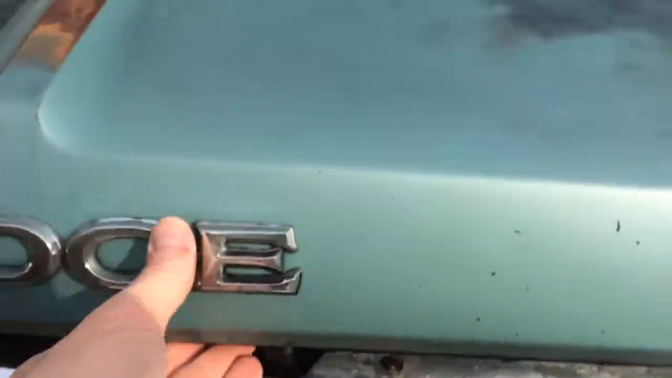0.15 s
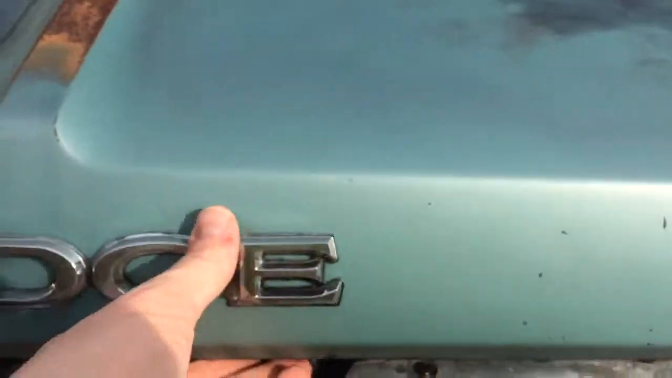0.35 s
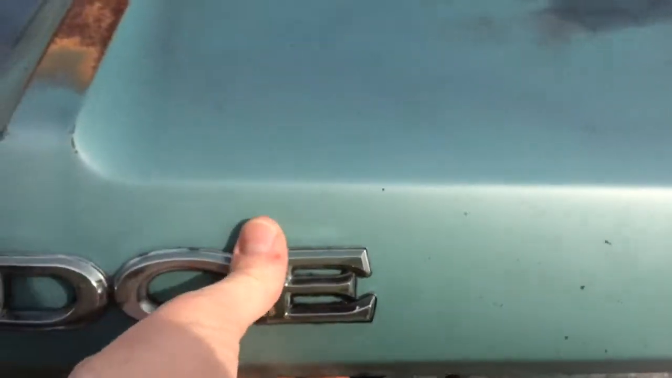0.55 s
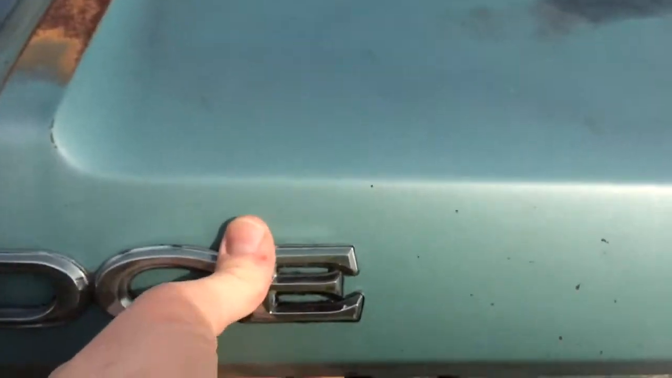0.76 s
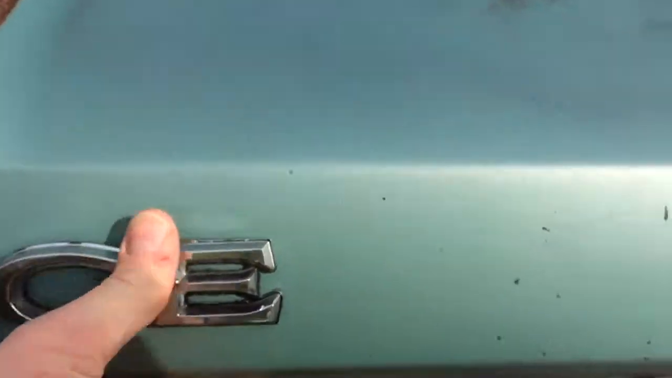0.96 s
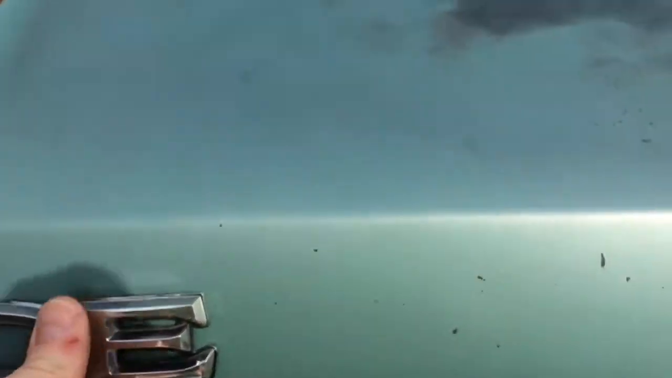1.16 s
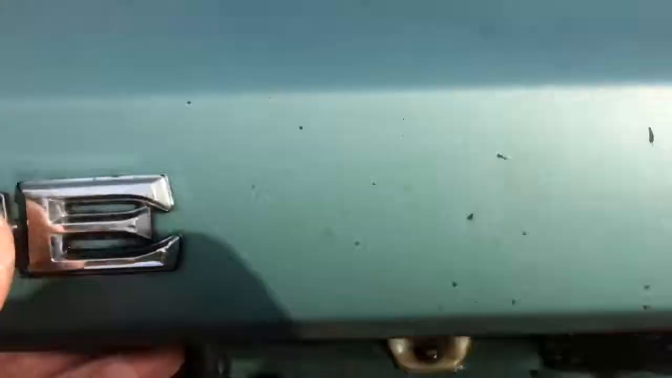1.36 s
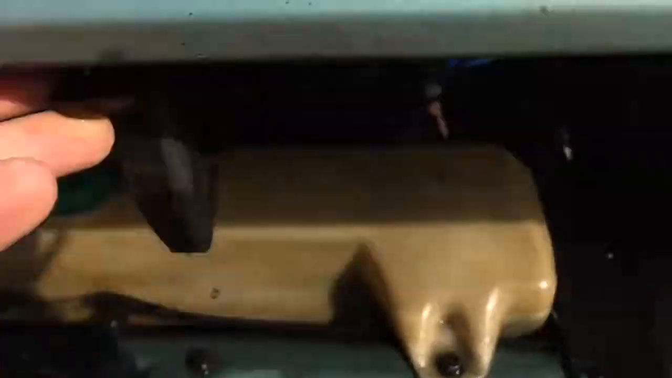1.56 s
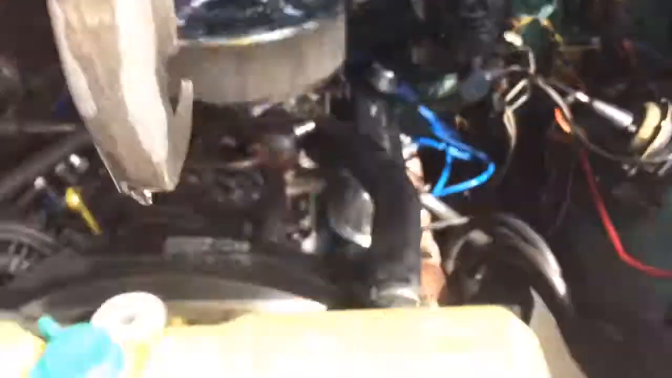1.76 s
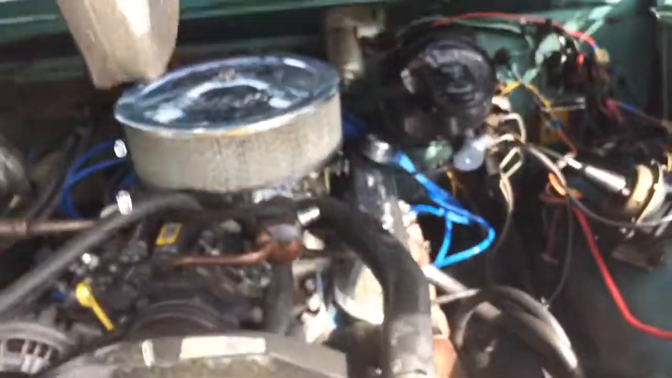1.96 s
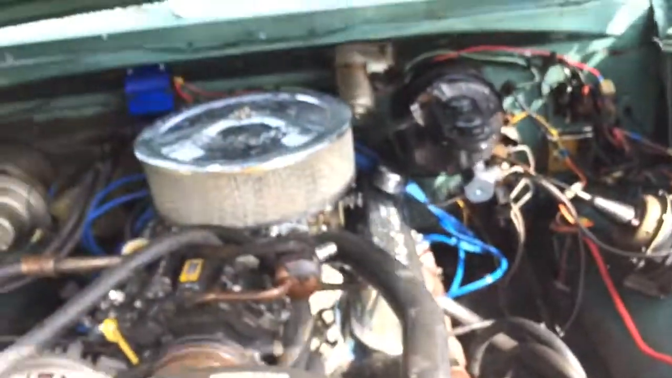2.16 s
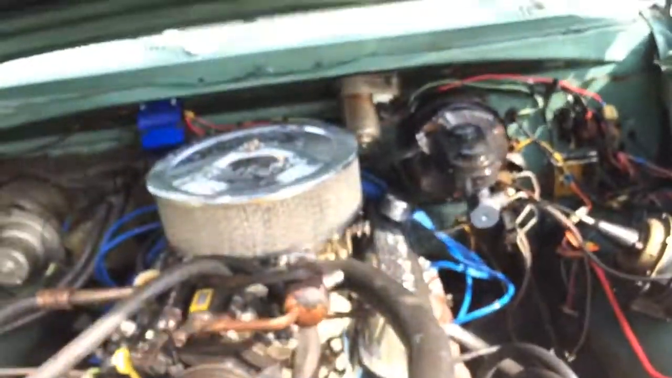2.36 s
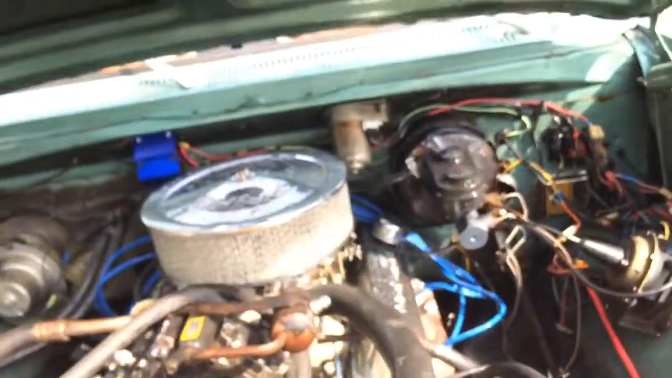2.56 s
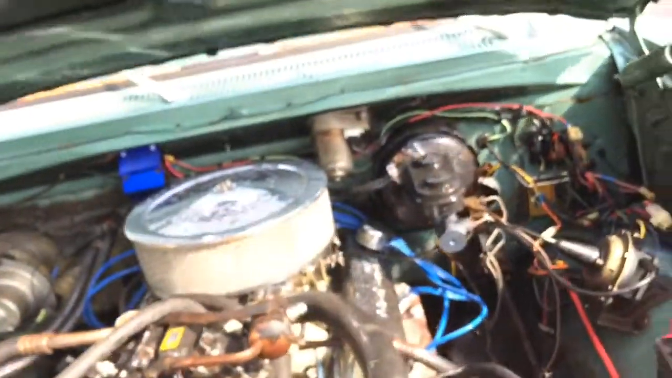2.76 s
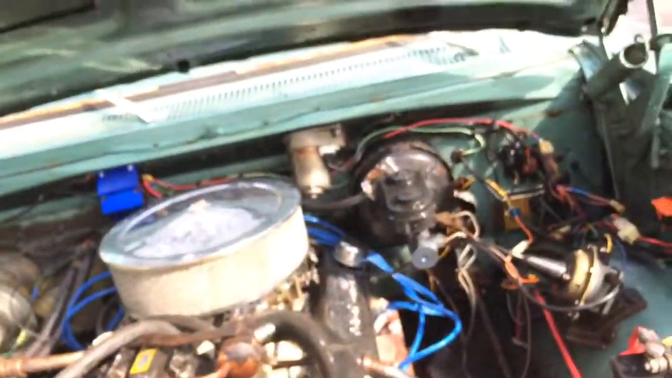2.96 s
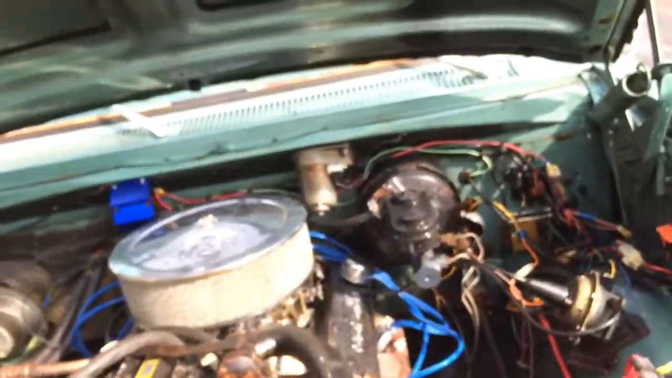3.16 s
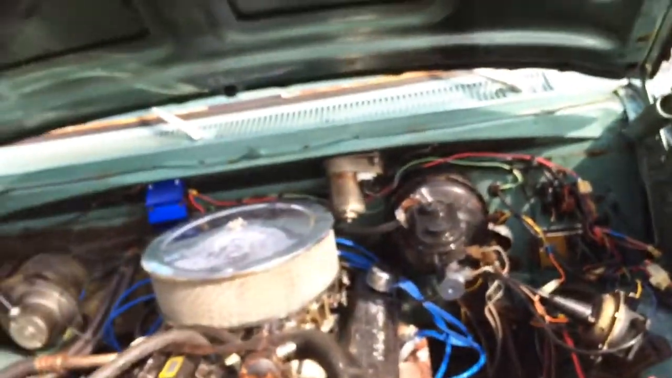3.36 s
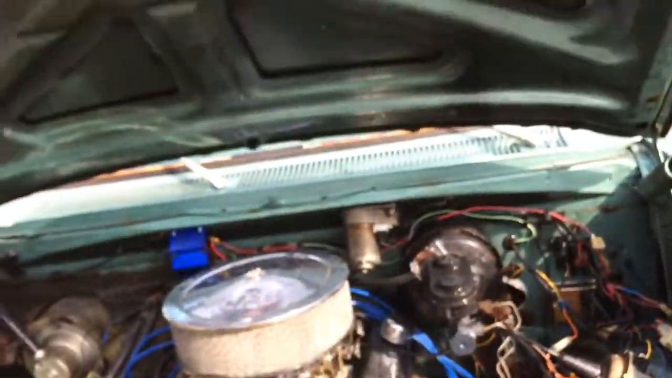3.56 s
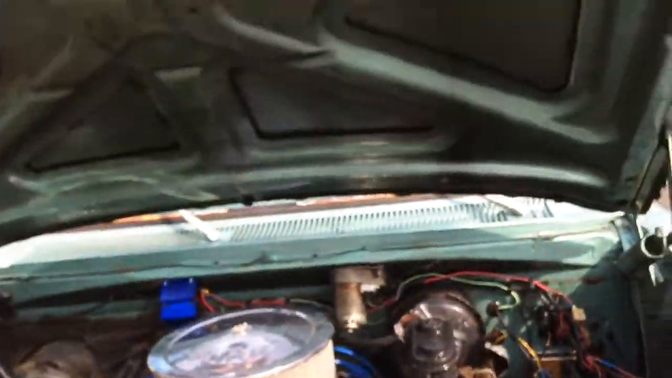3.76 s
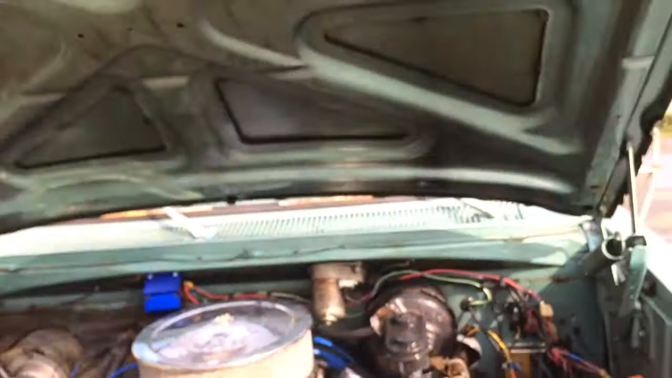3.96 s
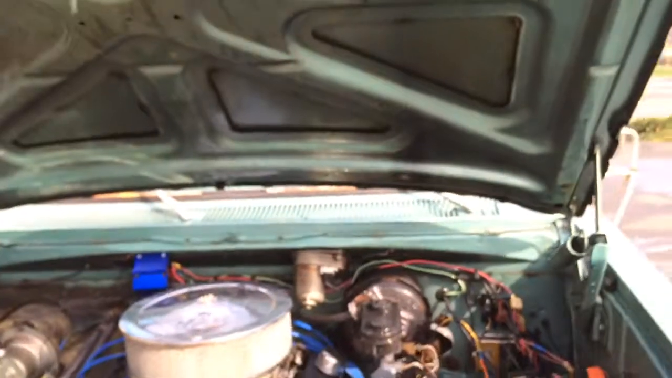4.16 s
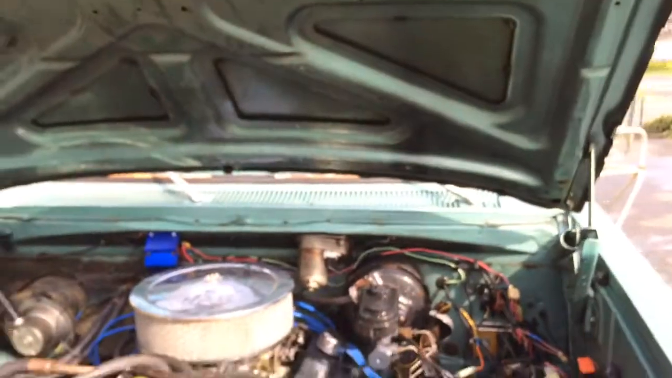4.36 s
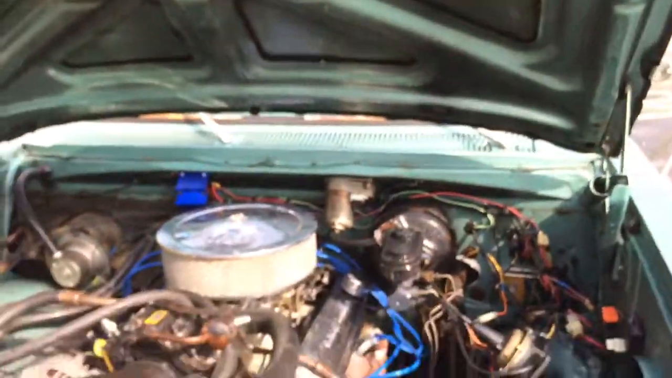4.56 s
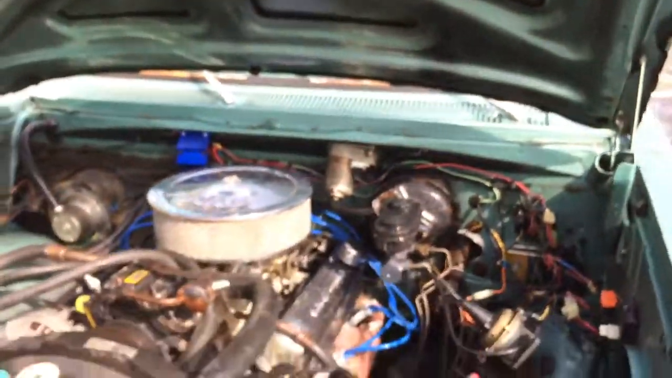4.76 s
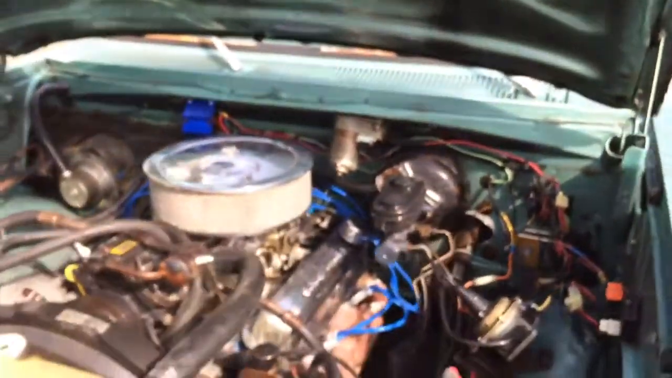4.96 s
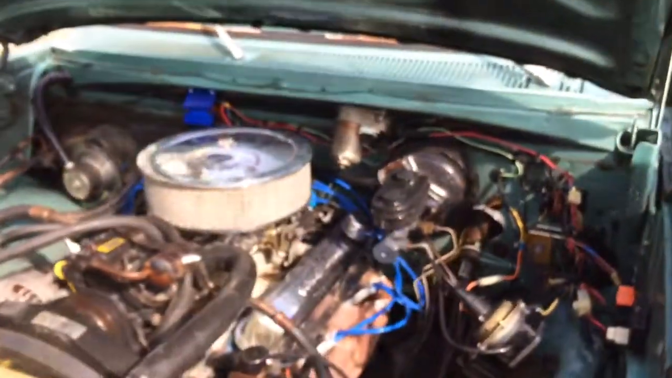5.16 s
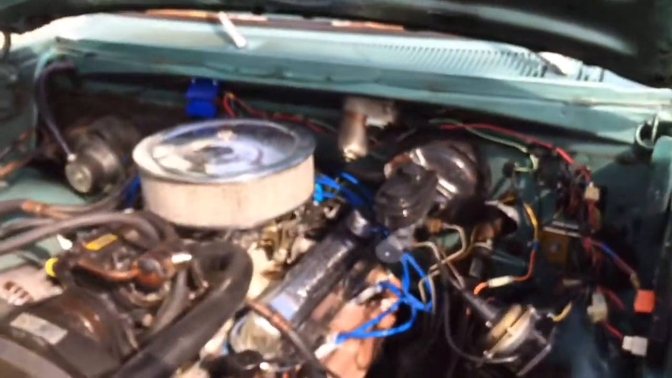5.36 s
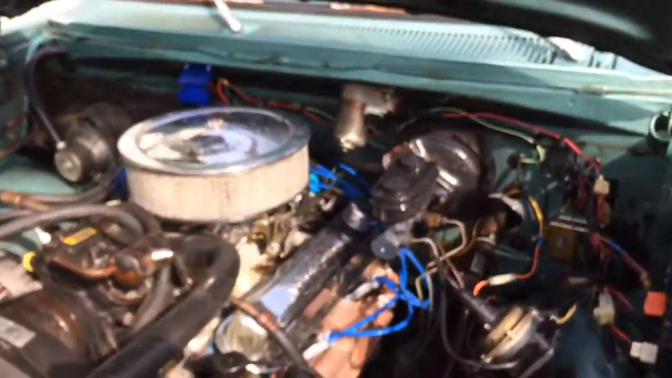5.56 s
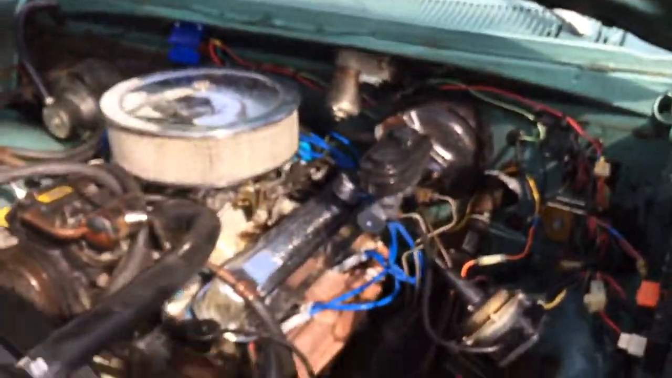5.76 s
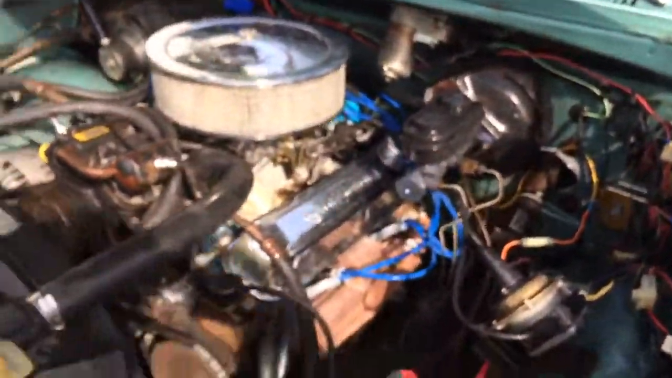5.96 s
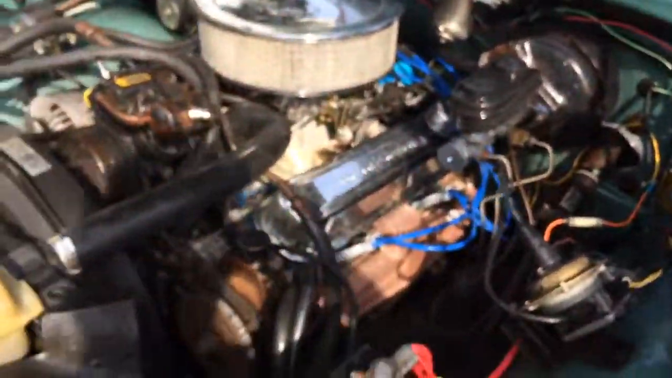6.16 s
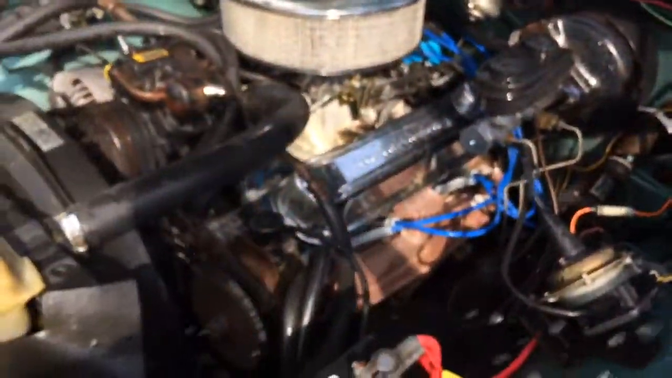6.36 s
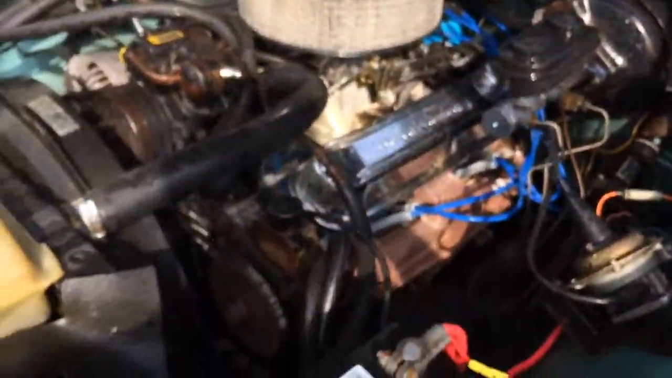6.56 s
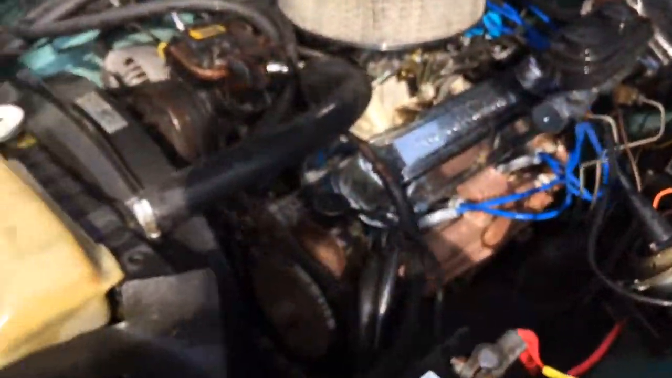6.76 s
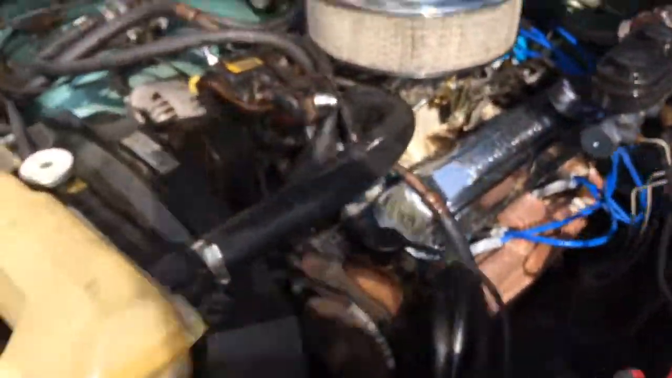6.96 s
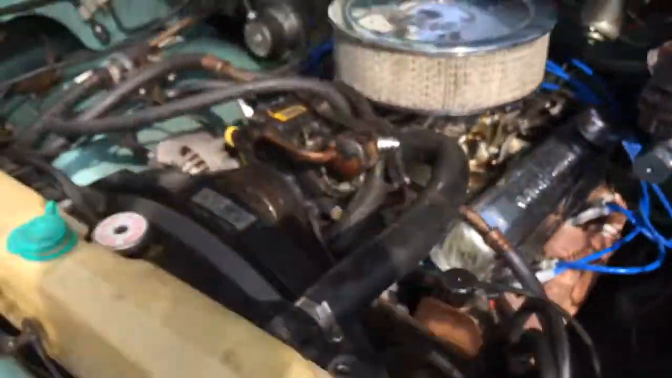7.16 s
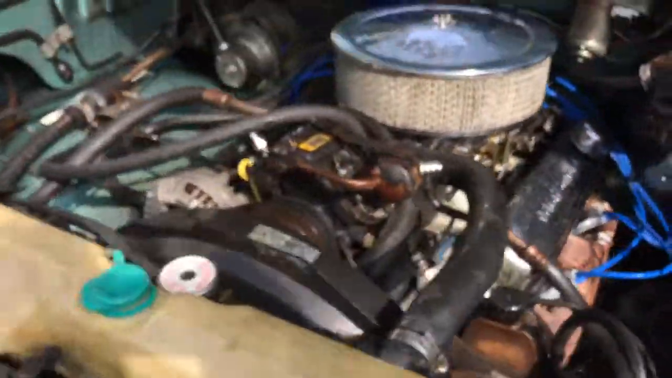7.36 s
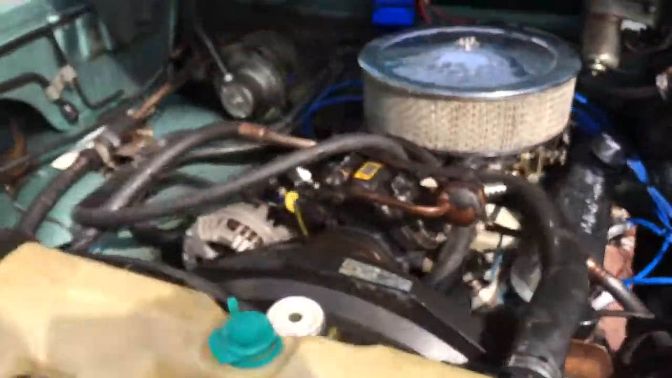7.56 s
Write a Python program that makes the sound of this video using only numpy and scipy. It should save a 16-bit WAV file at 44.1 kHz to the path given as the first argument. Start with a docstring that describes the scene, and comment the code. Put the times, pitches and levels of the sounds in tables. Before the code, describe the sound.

An old truck's steel hood is unlatched and heaved up with hard ringing metal bangs and boomy clunks, then small ticks over a low outdoor hum.

```python
"""Outdoors, a hand trips the latch of an old truck's steel hood, swings it up and it settles on its stops.
Blows ring the sheet as decaying bands of noise and modal sines; the latch ticks, rubs, scrapes and snaps.
Behind are shaped-noise traffic, a low drone and wind, a gliding engine tone and three steady machine tones.
Low thumps pulse among the blows, the hinge whistles, fingers tick and scrape, faint clicks scatter at random
and a bird calls at the end. A gain control lowers the level after loud blows and lets it recover slowly."""
import sys
import numpy as np
from scipy import signal
from scipy.fft import rfft, irfft, next_fast_len
from scipy.io import wavfile
from scipy.ndimage import uniform_filter1d

SR = 44100
rng = np.random.default_rng(int(sys.argv[2]) if len(sys.argv) > 2 else 0)


def store_pcm(level_fs):
    """Save levels as 16-bit WAV."""
    pcm = np.round(np.clip(level_fs, -1, 1) * 32767).astype(np.int16)
    wavfile.write(sys.argv[1], SR, np.atleast_2d(pcm).T)


N = 336042  # samples

# spectrum of far traffic, scaled later as a whole: hz, density_db_per_hz
TRAFFIC_SPECTRUM = [(88, -42), (150, -3.5), (197, -1.5), (320, -16), (471, -24.5), (618, -25.5), (1170, -9),
                    (1270, -10.5), (2920, -22), (12000, -31.5), (15500, -41)]
# spectrum of nearer tyre roar, scaled later as a whole: hz, density_db_per_hz
TYRE_SPECTRUM = [(150, -28), (250, -7.5), (603, -13.5), (913, -13.5), (1200, -18), (2090, -27),
                 (2760, -30.5), (7250, -42.5), (13000, -47.5), (15500, -50)]
# spectrum of a low drone around 200 Hz, scaled later as a whole: hz, density_db_per_hz
DRONE_SPECTRUM = [(110, -37), (150, 1.5), (200, 6), (240, -5.5), (320, -30)]
# mean level of tyre roar and of the low drone, partly the boom lingering after blows:
# time_s, tyre_roar_db, low_drone_db
ROAR_AND_DRONE_LEVELS = [(0, -50, -53.5), (.6, -51, -46), (1.05, -49.5, -61), (1.8, -50, -41),
                         (2.3, -53.5, -50), (2.85, -45.5, -44), (3.9, -53, -52), (4.9, -54, -48),
                         (5.901, -57.5, -59), (6.4, -62, -62), (7.62, -63.5, -60)]
# spectrum of wind on the microphone, scaled later as a whole: hz, density_db_per_hz
WIND_SPECTRUM = [(12, -49.5), (20, -13.5), (75, -1), (111, -2.5), (135, -7.5), (180, -36.5), (300, -120)]
# mean level of the wind: time_s, level_db
WIND_LEVELS = [(0, -44), (.3, -52), (1.4, -43), (1.8, -49), (2.1, -44), (2.7, -45), (3.6, -48),
               (3.9, -46.5), (4.3, -61), (4.9, -49.5), (6.401, -53.5), (6.899, -57.5), (7.62, -48)]
FAR_TRAFFIC_DB = -66

# ticks of latch, hinge and fingers: start_s, ring_peak_db, ring_hz, drive_t60_s, snap_db (re ring peak)
TICKS = [(0.175, -42.5, 1530, .064, 3.5), (0.315, -50, 972, .056, 5), (0.515, -18.5, 1350, 0.018, -9),
         (0.531, -27, 1210, 0.074, 2), (0.545, -36, 2120, .05, -2), (0.556, -29, 1270, 0.039, -2),
         (0.572, -24, 1200, .04, -11), (0.604, -36, 970, .037, -9), (1.755, -50, 1010, .05, 9),
         (1.773, -49, 2270, 0.051, -14), (3.886, -38.5, 1010, 0.047, -27), (4.214, -49, 950, 0.055, 4),
         (4.45, -35.5, 930, 0.073, -3), (4.777, -34.5, 1860, 0.029, -15), (4.849, -32, 1650, .07, -26),
         (4.871, -28, 1430, 0.085, -30), (5.098, -39.5, 890, 0.094, -19), (5.162, -31, 1030, 0.13, -3),
         (5.499, -41, 940, 0.042, 0), (5.537, -31.5, 1220, 0.074, -11), (5.617, -42.5, 1130, 0.19, -7),
         (5.655, -29.5, 1410, 0.077, -23), (5.911, -36, 700, .062, -2), (6.045, -35, 1560, .12, -6.5),
         (6.105, -44, 1480, 0.085, -6), (6.124, -45.5, 1460, 0.18, 1), (6.173, -40.5, 1510, .11, -2),
         (7.276, -46, 1137, 0.053, -17), (7.379, -50, 2500, .09, -1), (6.597, -56, 4200, .07, -7)]
RING_WIDTH_SHARE, SNAP_HZ = 0.66, 4060  # width of one ring resonator as a share of its pitch
FAINT_PER_S, FAINT_FLOOR_DB, FAINT_T60_S = 0.7, -59, 0.05

# strokes of the latch lever: start_s, length_s, level_db (at mid-stroke)
LEVER_STROKES = [(.24, 0.15, -61.5), (.42, .1, -62), (1.25, 0.069, -66)]
# modes of the lever: hz, width_hz (narrowed later by one factor), level_db (relative)
LEVER_MODES = [(4800, 160, 0), (5500, 37, -2), (6340, 150, -2), (7360, 120, -4), (8340, 100, -11),
               (10800, 56, -7), (10950, 110, -15)]

# rubbing of latch hook and fingers: start_s, rise_s, fall_s, top_db, end_db, hiss (under the slips)
SCRAPES = [(.511, 0.0059, .11, -35, -57, 0.18), (1.195, 0.021, 0.054, -43.5, -65, 1.8),
           (5.096, 0.0038, 0.057, -39, -56, 0.36), (5.138, 0.031, 0.055, -43, -77, 0.63),
           (5.641, 0.014, 0.057, -30.5, -72, 1.9)]
# one spectrum per kind of scrape, scaled later as a whole: hz, density_db_per_hz
SCRAPE_SPECTRA = [
    [(410, 10), (700, -3), (1270, -17), (1540, 2), (3490, -19), (4190, -10.5), (6680, -24.5), (8320, -25),
     (15500, -40)],
    [(880, -28), (1500, 3), (1820, -26), (2010, -1), (3280, -9), (3910, -2), (4350, -17), (6310, -12),
     (15500, -56)],
    [(880, -39), (1500, -14), (1920, -6), (2260, -12), (2570, -26), (2940, -17), (5140, -17), (10500, -3.5),
     (15500, -7)],
    [(530, -49), (900, -21), (1230, -17), (1400, 6), (1750, -29), (2100, -20), (2930, -21), (3420, -26),
     (4180, -12.5), (5910, -14), (15500, -41)],
]
# spectrum of each scrape in turn: index
SCRAPE_KINDS = [0, 1, 2, 2, 3]
SCRAPE_START_DB = -24  # re the top

# an engine revving far off: time_s, pitch_hz, level_db
ENGINE_REV = [(0.55, 82.5, -52.5), (1.1, 77.42, -39), (1.49, 97.8, -44), (1.81, 100.9, -40.5),
              (2.19, 107.1, -57), (2.32, 108.6, -55), (2.45, 105.1, -45.5), (2.72, 101.4, -44),
              (2.9, 92, -38)]

# blows on the hood: start_s, level_db (at the spectral peak, trimmed later), bass_db and treble_db (re level),
# clunk_hz, clunk_db (re level), peak_t60_s (near 2.6 kHz), softness (0 to 1)
BLOWS = [(0.7497, -30.5, 7, -9, 1016, -21, 0.09, 0), (1.0385, -16, -16.5, -3.5, 2520, -20, 0.15, 0.18),
         (1.4295, -54.5, 21.5, -15, 766, -12.5, 0.074, 0.2), (1.4669, -32.5, 6.5, -49, 1490, -1, .11, 0.03),
         (1.5326, -57, 18, 6, 707, -19, 0.3, 0), (1.6115, -14.5, 6.5, -0.5, 1000, -7.5, 0.12, 0.2),
         (2.6242, -20.5, -7, -14, 1740, -36, 0.12, 0.08), (2.7487, -17.5, -9, -18, 1420, -17, 0.12, 0.38),
         (2.8406, -29, -9, -23, 1550, -13, .12, 0.03), (2.9931, -17.5, 3, -36, 800, -12.5, 0.12, 0.5),
         (3.0175, -28.5, 6, -11.5, 710, -12.5, 0.15, 1), (3.0601, -7.5, -10.5, -18.5, 2460, -15, .11, 0.04),
         (3.1206, -17.5, 4, -22, 783, -8, 0.1, 0.15), (3.3004, -30.5, -4.5, -39, 1570, -13, 0.067, 0.05)]
# centres of thud, boom, drum, body, peak, edge and air: hz
BAND_HZ = [105, 200, 380, 900, 2600, 6200, 10500]
# how the four bands below the peak follow a blow's bass: share, offset_db
BASS_LAW = [(0.66, -7.5), (.95, 0), (0.94, 1), (.55, -2)]
# how the two bands above the peak follow a blow's treble: share, offset_db
TREBLE_LAW = [(.3, -0.5), (1.0, 1)]
# strongest panel modes: hz, level_db (re the blow's spectrum), t60_s (scaled by each blow's ring)
HOOD_MODES = [(141.5, -5, 1), (216.4, -4.5, 0.54), (219.7, -11.5, 0.57), (293.4, -9.5, 0.27),
              (339, -7.5, 0.47), (368.6, -3, 0.26), (435.4, -9.5, 0.38), (468.2, -7.5, 0.26),
              (612.4, -5.5, 0.12), (783, -20, 0.065), (972, -8.5, 0.31), (1210, -16.5, 0.19),
              (1550, -10, 0.19)]
# decay of the crowd of close modes in the sheet: hz, t60_s (scaled by each blow's ring)
SHEET_T60 = [(80, 0.64), (200, 0.94), (400, 0.59), (1000, 0.28), (2500, .15), (6000, 0.11), (14000, 0.088)]

# low thumps and puffs: start_s, peak_db, pitch_hz
THUMPS = [(0.956, -50, 75.4), (1.202, -31, 76), (2.32, -31, 107), (2.467, -25, 85.2), (2.535, -25.5, 78),
          (2.586, -27, 89), (2.869, -23, 213), (3.079, -15, 102.8), (3.148, -14.5, 98), (3.264, -24.5, 253),
          (3.541, -30.5, 52.7), (3.635, -26, 87), (3.747, -38.5, 256), (3.832, -25.5, 110),
          (3.92, -32.5, 150), (4.195, -32.5, 117), (4.29, -31, 105)]
THUMP_S = 0.033

# the latch hook snaps: start_s, level_db, t60_s
CLACKS = [(1.039, -21, 0.14), (1.21, -56, 0.13)]
# clusters of modes in the latch: hz, width_hz (of each resonator pass), level_db (relative)
LATCH_CLUSTERS = [(2520, 260, -21), (3340, 150, -1), (3640, 300, 3.5), (4170, 180, -10), (6040, 230, -9.5),
                  (5860, 500, -4.5), (8020, 500, -25)]

# hinge whistles: start_s, length_s, start_hz, end_hz, level_db (before the swell), flutter_hz
HINGE_WHISTLES = [(1.72, .09, 2275, 2275, -62, 100), (1.84, .075, 2275, 2275, -65, 100)]
# bird notes: start_s, length_s, start_hz, end_hz, level_db (before the swell), flutter_hz
BIRD_NOTES = [(7.27, .14, 8000, 7980, -78, 400), (7.4, .11, 6900, 7550, -79, 300),
              (7.52, .1, 6600, 7100, -81, 1200)]
SLIDE_S = 0.03  # time constant of the pitch slide

# levels of the two upper machine tones: time_s, first_db, second_db
MACHINE_LEVELS = [(3.95, -40, -54), (4.2, -48, -52), (4.6, -46, -47), (5.8, -46, -47.5), (6.25, -44, -51.5),
                  (6.42, -56, -44.5), (6.75, -49.5, -42.5), (6.9, -66.5, -53.5), (7.15, -51.5, -52),
                  (7.62, -59, -63)]
# mean pitch of the two tones and a weak third below them: hz
MACHINE_HZ = [120.3, 95.6, 60.6]
LOW_TONE_DB = -55.5

EDGE_HZ = 15400  # upper band limit


def gain_of(db):
    """Logarithmic level: 20 dB is a tenfold amplitude."""
    return 10 ** (np.asarray(db) / 20)


def evened(x):
    """Energy normalisation: scales to rms 1."""
    return x / np.sqrt(np.mean(x ** 2) + 1e-20)


def read(points, hz):
    """Interpolation of a table on a log-frequency axis."""
    f, value = np.transpose(points)
    return np.interp(np.log(hz + 1), np.log(f + 1), value)


def columns(rows):
    """Linear interpolation in time: gives the start, sample times and curves of a table."""
    s, *cols = np.transpose(rows)
    t = np.arange(s[0], s[-1], 1 / SR)
    return s[0], t, [np.interp(t, s, c) for c in cols]


def add(mix, s, sound):
    """Superposition: adds a sound at time s."""
    part = mix[round(s * SR):][:len(sound)]
    part += sound[:len(part)]


def coloured(x, points):
    """Spectral shaping: filters x by a tabulated spectrum, then scales to rms 1."""
    size = next_fast_len(len(x))
    hz = np.fft.rfftfreq(size, 1 / SR)
    inside = (hz > points[0][0]) & (hz < points[-1][0])
    spectrum = rfft(x, size) * gain_of(read(points, hz)) * inside
    return evened(irfft(spectrum, size)[:len(x)])


def slow(count, per_s):
    """Low-passed noise: a smooth random curve of rms 1 that changes about per_s times a second."""
    width = max(int(SR / per_s), 1)
    once = uniform_filter1d(rng.standard_normal(count), width)
    return evened(uniform_filter1d(once, width))


def resonate(x, hz, width):
    """Simple resonance: shifts hz to zero, low-passes and shifts back, with gain 1 at hz."""
    turn = np.exp(2j * np.pi * hz * np.arange(len(x)) / SR)
    r = np.exp(-np.pi * abs(width) / SR)
    return 2 * (turn * signal.lfilter([1 - r], [1, -r], x / turn)).real


def tone(t, hz, db, waver, waver_db):
    """Frequency and amplitude modulation: a sine wavers a little in pitch and level, with soft ends."""
    phase = 2 * np.pi * np.cumsum(hz * (1 + waver * slow(len(t), per_s=6))) / SR
    level = np.sqrt(2) * gain_of(db + waver_db * slow(len(t), per_s=8.7))
    return level * np.sin(phase) * signal.windows.tukey(len(t), 0.1)


def traffic():
    """Incoherent sources sum to noise: a steady far wash and nearer tyre roar, with a low drone."""
    t = np.arange(N) / SR
    s, *levels = np.transpose(ROAR_AND_DRONE_LEVELS)
    roar_db, drone_db = (np.interp(t, s, c) for c in levels)
    far, near, low = rng.standard_normal((3, N))
    out = gain_of(FAR_TRAFFIC_DB + 0.74 * slow(N, per_s=12)) * coloured(far, TRAFFIC_SPECTRUM)
    out += gain_of(roar_db + 1.9 * slow(N, per_s=17)) * coloured(near, TYRE_SPECTRUM)
    return out + gain_of(drone_db + 1.0 * slow(N, per_s=9.5)) * coloured(low, DRONE_SPECTRUM)


def wind():
    """Turbulent pressure on the microphone: low noise whose level is lumpy."""
    wind_db = np.interp(np.arange(N) / SR, *np.transpose(WIND_LEVELS))
    rumble = coloured(rng.standard_normal(N), WIND_SPECTRUM)
    return gain_of(wind_db + 4.0 * slow(N, per_s=54)) * rumble


def tick(peak_db, hz, t60, snap_db):
    """Impulse excitation: a click with dying grit rings a low resonance and snaps a high one."""
    t = np.arange(6000) / SR
    a, b = rng.standard_normal((2, len(t)))
    hit = (t == 0) * 15.0 + a * gain_of(-60 * t / max(t60, 0.004))
    width = RING_WIDTH_SHARE * hz
    ring = resonate(resonate(hit, hz, width), hz, width)
    grit = b * (np.exp(-t / 0.0012) + 0.14 * np.exp(-t / 0.015))
    snap = resonate(resonate(grit, SNAP_HZ, SNAP_HZ), SNAP_HZ, 5.4 * SNAP_HZ)
    snap += 0.2 * np.diff(grit, prepend=0)  # brightens the edge
    ring_part = gain_of(peak_db) * ring / abs(ring).max()
    return ring_part + gain_of(peak_db + snap_db) * snap / abs(snap).max()


def faint_clicks(mix):
    """Uniform random process: a sparse scatter of faint clicks of random time, level and pitch."""
    for when, size, pitch in rng.random((round(FAINT_PER_S * N / SR), 3)):
        sound = tick(FAINT_FLOOR_DB + 5 * size, 950 + 500 * pitch, FAINT_T60_S, snap_db=4.3)
        add(mix, when * N / SR, sound)


def lever(length, db):
    """Friction excitation: uneven drag noise keeps the lever's modes ringing."""
    t = np.arange(0, length, 1 / SR)
    drag = rng.standard_normal(len(t)) * gain_of(2.3 * slow(len(t), per_s=53))
    rings = sum(gain_of(g) * evened(resonate(drag, f, 0.77 * w)) for f, w, g in LEVER_MODES)
    return gain_of(db) * np.sin(np.pi * t / length) * evened(rings)


def scrape(rise, fall, top_db, end_db, hiss, spectrum):
    """Stick-slip friction: uneven slips click over a hiss."""
    t = np.arange(0, rise + fall, 1 / SR)
    level_db = np.interp(t, [0, rise, rise + fall], [top_db + SCRAPE_START_DB, top_db, end_db])
    happens = rng.random(len(t)) < 180 / SR  # on average 180 slips a second
    slips = happens * gain_of(1.3 * rng.exponential(1, len(t)).clip(0, 3))
    grain = hiss + signal.lfilter([1], [1, -np.exp(-1 / (0.0012 * SR))], slips)  # time constant 1.2 ms
    sound = coloured(grain * rng.standard_normal(len(t)), spectrum)
    return gain_of(level_db) * sound * signal.windows.tukey(len(t), 0.1)


def revving():
    """Periodic source of changing rate: the far engine's tone glides in pitch and level."""
    s, t, (hz, db) = columns(ENGINE_REV)
    return s, tone(t, hz, db, waver=0.0008, waver_db=0)


def blow(level_db, bass_db, treble_db, clunk_hz, clunk_db, peak_t60, softness):
    """Modal density: a sheet's crowded modes ring as ragged dying noise; the strongest stand out as tones."""
    t = np.arange(1 << 15) / SR
    hz = np.fft.rfftfreq(len(t), 1 / SR)
    bass = [share * bass_db + offset for share, offset in BASS_LAW]
    treble = [share * treble_db + offset for share, offset in TREBLE_LAW]
    spectrum = list(zip(BAND_HZ, level_db + np.array(bass + [0] + treble)))
    spectrum.append((15500, spectrum[-1][1] - 6.5))
    # random uneven spectrum, drawn anew for each blow
    uneven = uniform_filter1d(rng.standard_normal(len(hz)), 50)
    uneven_db = 2 * evened(uniform_filter1d(uneven, 50))
    white = rng.standard_normal(len(t))
    noise = rfft(white) * gain_of(uneven_db)
    rattle = gain_of(0.28 * slow(len(t), per_s=240))  # loose parts chatter
    ring = peak_t60 / read(SHEET_T60, BAND_HZ[4])  # scales the decay of all bands
    contact = 0.012 * np.clip(softness, 0, 1)  # s; a soft contact slows the onset
    out = np.zeros(len(t))
    for centre in 70 * 2 ** (np.arange(17) / 2):  # half-octave steps
        share = np.cos(np.pi * np.clip(np.log2((hz + 1) / centre), -0.5, 0.5)) ** 2
        band = evened(irfft(noise * share))
        swell = 1 - np.exp(-t / (0.97 / centre + contact))  # bass takes a cycle to build
        dying = gain_of(-60 * t / (ring * read(SHEET_T60, centre)))
        dying += 0.5 * np.exp(-t / 0.0013)  # the initial crack
        gain = gain_of(read(spectrum, centre) - 9.5 - 0.76 * (centre < 600))
        out += gain * band * swell * dying * (rattle if centre > 600 else 1)
    clunk = evened(resonate(white, clunk_hz, 100)) * (1 - np.exp(-t / (0.0012 + contact)))
    out += gain_of(level_db + clunk_db - 60 * t / (ring * read(SHEET_T60, clunk_hz))) * clunk
    for (f, db, t60), (size, turn) in zip(HOOD_MODES, rng.random((len(HOOD_MODES), 2))):
        mode_db = read(spectrum, f) + db + 1 - 5 * size - 60 * t / (ring * t60)
        swell = 1 - np.exp(-t / (1.5 / f + contact))
        out += gain_of(mode_db) * np.sin(2 * np.pi * (f * t + turn)) * swell
    return out


def thump(peak_db, hz):
    """Windowed oscillation: a low sine under a smooth window is a short low-pitched pulse."""
    t = np.arange(0, THUMP_S, 1 / SR)
    return gain_of(peak_db) * np.sin(2 * np.pi * (hz * t + rng.random())) * np.hanning(len(t))


def clack(db, t60):
    """Resonant filtering: the snapping latch rings as a few rough clusters of modes that die together."""
    t = np.arange(12000) / SR
    white = rng.standard_normal(len(t))
    rings = sum(gain_of(g) * evened(resonate(resonate(white, f, w), f, w)) for f, w, g in LATCH_CLUSTERS)
    return gain_of(db - 60 * t / t60) * evened(rings) * (1 - np.exp(-t / 0.0013))


def whistle(length, start_hz, end_hz, db, flutter_hz):
    """Modulation sidebands: flutter blurs a thin tone that swells, fades and settles at its end pitch."""
    t = np.arange(0, length, 1 / SR)
    hz = end_hz + (start_hz - end_hz) * np.exp(-t / SLIDE_S)
    flutter = evened(1.3 + slow(len(t), per_s=flutter_hz))
    swell = np.sin(np.pi * t / length) ** 0.5
    return swell * flutter * tone(t, hz, db, waver=0.001, waver_db=0)


def machine_tones():
    """Superposed periodic sources: two tones of drifting level sound over a weak third."""
    s, t, levels = columns(MACHINE_LEVELS)
    tones = zip(MACHINE_HZ, levels + [LOW_TONE_DB])
    return s, sum(tone(t, hz, db, waver=0.005, waver_db=1) for hz, db in tones)


def scene():
    """Linear superposition of all sources."""
    mix = traffic() + wind()
    for events, source in ((TICKS, tick), (LEVER_STROKES, lever), (BLOWS, blow), (THUMPS, thump),
                           (CLACKS, clack), (HINGE_WHISTLES + BIRD_NOTES, whistle)):
        for s, *row in events:
            add(mix, s, source(*row))
    for (s, *row), kind in zip(SCRAPES, SCRAPE_KINDS):
        add(mix, s, scrape(*row, SCRAPE_SPECTRA[kind]))
    add(mix, *revving())
    add(mix, *machine_tones())
    faint_clicks(mix)
    return mix[None]


def record(dry):
    """Dynamic compression: gain falls after loud blows and recovers slowly; then a low-pass band limit."""
    power_db = 10 * np.log10(abs(uniform_filter1d(dry[0] ** 2, 400)) + 1e-12)
    fall = np.arange(N) * 32.0 / SR  # the held peak sinks 32 dB a second
    held_db = np.maximum.accumulate(power_db + fall) - fall
    over_db = np.maximum(held_db + 25.5, 0)  # excess above -25.5 dB
    late = signal.lfilter([0.003], [1, -0.997], over_db)  # reacts within some 8 ms
    ducked = dry / gain_of(0.24 * late)
    low_pass = signal.firwin(511, EDGE_HZ, window=("kaiser", 9), fs=SR)
    return signal.oaconvolve(ducked, low_pass[None], "same")


dry = scene()
out = record(dry)
store_pcm(out)
```